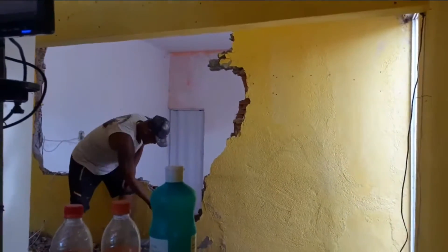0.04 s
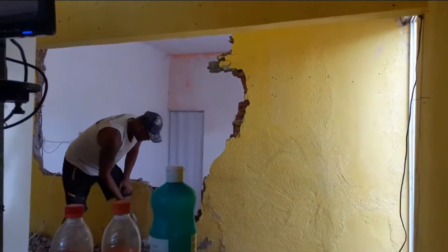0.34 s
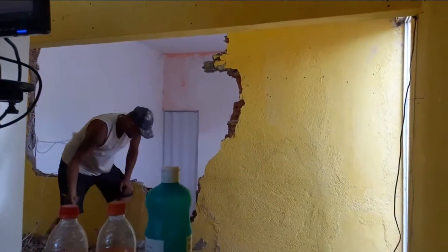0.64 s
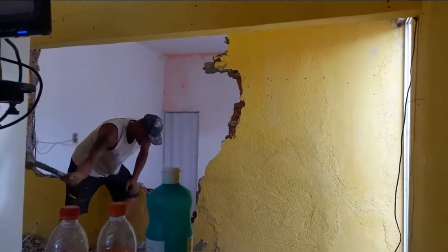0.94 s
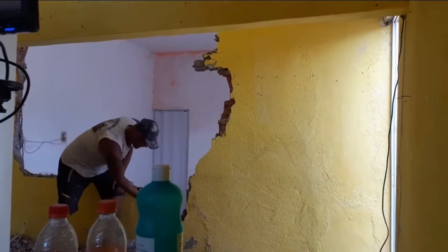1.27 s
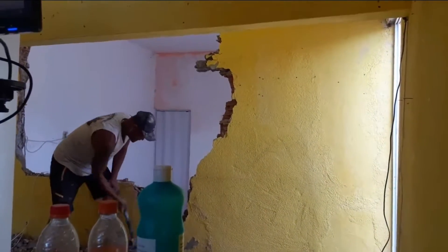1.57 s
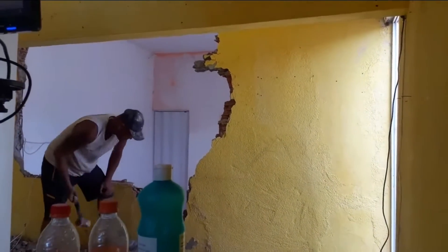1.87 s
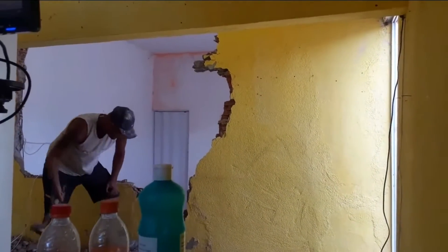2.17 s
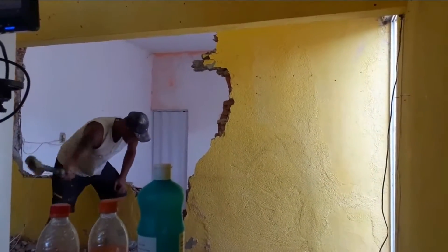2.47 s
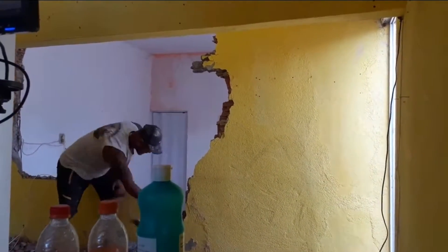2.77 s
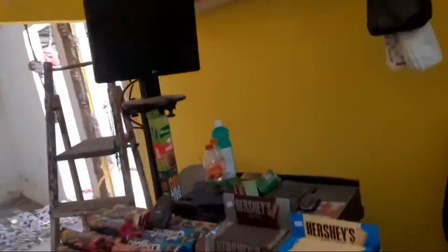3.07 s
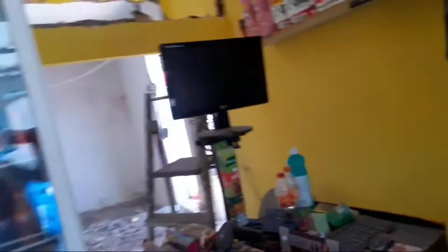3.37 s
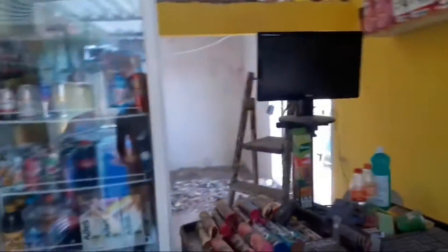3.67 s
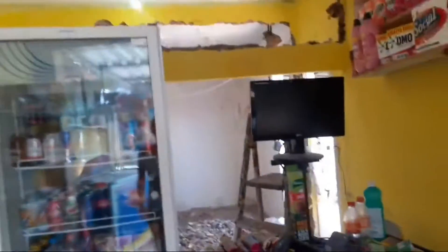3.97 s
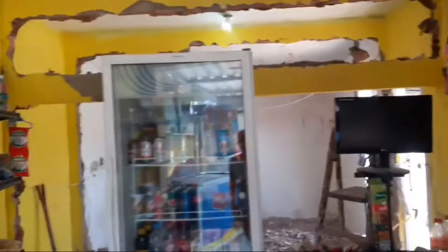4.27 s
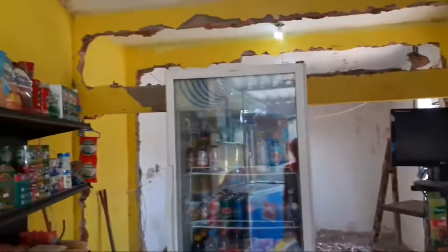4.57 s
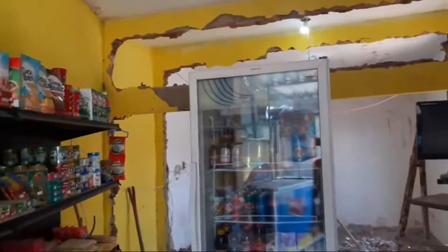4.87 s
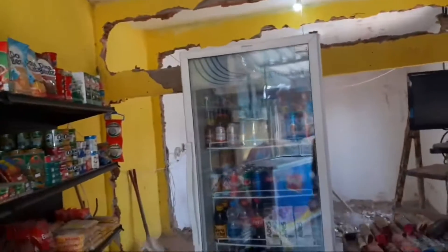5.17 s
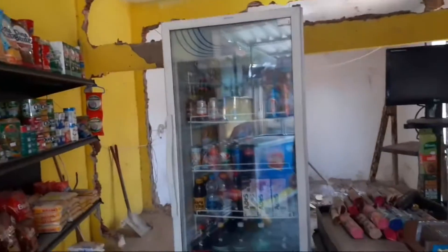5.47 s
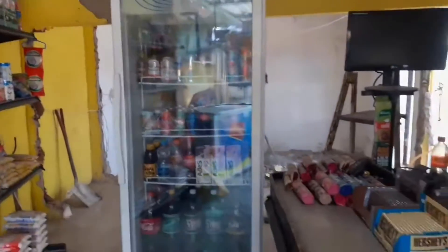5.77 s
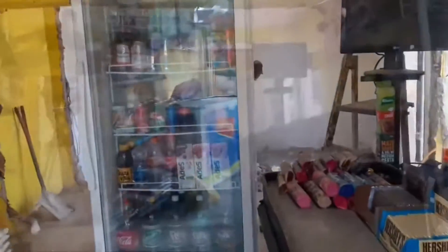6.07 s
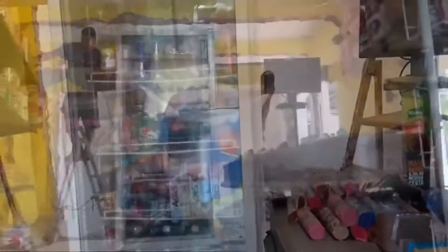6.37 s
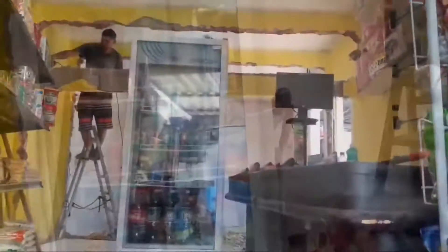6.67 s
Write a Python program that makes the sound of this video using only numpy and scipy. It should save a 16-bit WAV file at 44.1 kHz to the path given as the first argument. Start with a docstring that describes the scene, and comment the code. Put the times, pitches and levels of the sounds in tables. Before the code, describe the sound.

A sledgehammer hits a brick wall right at the start, a sharp crack with a deep boom that rings briefly through a bare room. Small chips tick and clink on the floor amid a fine trickle of mortar dust. A second blow lands at about 1.4 seconds, with more falling chips, and a third, duller and cut short, at 3 seconds. From there broken masonry slides and clatters against a ringing steel shovel, somewhat to the right, with a low rumble and dull thuds from the heap. The first run of short slides lasts until about 4.2 seconds; after a lull, a second runs from 5 to 6 seconds. From about 5.7 seconds a distant grinder swells up, its disc hissing and its whine sinking as it bites, growing louder until the end near 7 seconds. A cooler hums faintly underneath.

```python
"""A bare room with a humming cooler. A sledgehammer strikes a brick wall three times: the brick cracks,
wall and room boom, chips and mortar dust patter down. Then broken masonry slides and clatters against
a ringing steel shovel, in two runs of short slides, while the heap rumbles underneath.
At the end a distant grinder swells up, its disc hissing and its whine sinking as it bites."""
import sys
import numpy as np
from scipy import signal
from scipy.fft import rfft, irfft, next_fast_len
from scipy.io import wavfile
from scipy.ndimage import uniform_filter1d

SR = 44100
rng = np.random.default_rng(int(sys.argv[2]) if len(sys.argv) > 2 else 0)


def master_out(mix):
    """Clip the mix to full scale and print it as 16-bit PCM to the path in sys.argv[1]."""
    frames = np.transpose(np.atleast_2d(mix))
    ceiling = np.clip(frames, -1, 1)
    pcm = np.round(ceiling * 32767).astype(np.int16)
    wavfile.write(sys.argv[1], SR, pcm)


N = 306054
TIME = np.arange(N) / SR


def from_db(db):
    """Decibels to gain."""
    return np.exp(np.asarray(db) * (np.log(10) / 20))


def rms_one(x):
    """Scale to rms 1."""
    return x / np.sqrt(np.mean(x ** 2) + 1e-20)


def at_hz(points, hz):
    """Read a table on a log-frequency axis."""
    freqs, values = np.transpose(points)
    return np.interp(np.log(hz + 1e-9), np.log(freqs), values)


def colour(x, spectrum):
    """EQ a sound to a curve that falls away steeply beyond its ends; rms 1."""
    size = next_fast_len(N, True)
    hz = np.linspace(0, SR / 2, size // 2 + 1)
    low_cut = 1 + (.8 * spectrum[0][0] / (hz + 1)) ** 8
    high_cut = 1 + (.8 * hz / spectrum[-1][0]) ** 8
    gain = from_db(at_hz(spectrum, hz)) / np.sqrt(low_cut * high_cut)
    return rms_one(irfft(rfft(x, size) * gain, size)[..., :N])


def pan_gains(left_db):
    """Stereo gains that put left this many dB over right."""
    return from_db(left_db / 2 * np.array([[1], [-1]]))


def panned(x, pan):
    """Lean a stereo sound left or right, differently in each band."""
    size = next_fast_len(N, True)
    left_db = at_hz(pan, np.linspace(0, SR / 2, size // 2 + 1))
    return irfft(rfft(x, size) * pan_gains(left_db), size)[:, :N]


def add(out, start_s, sound):
    """Mix a sound in at its start time."""
    start = max(round(start_s * SR), 0)
    out[..., start:start + sound.shape[-1]] += sound[..., :N - start]


def resonance(x, hz, width_hz):
    """Two-pole resonance that keeps the power of white noise."""
    r = np.exp(-np.pi * width_hz / SR)
    feedback = [1, -2 * r * np.cos(2 * np.pi * hz / SR), r * r]
    return signal.lfilter(np.sqrt((1 - r * r) / 2) * np.array([1, 0, -1]), feedback, x)


def drift(per_s):
    """Slow random wandering; rms 1."""
    knots = rng.standard_normal(4096)
    return rms_one(np.interp(TIME * per_s, np.arange(len(knots)), knots))


def swells(rows, attack_s, release_s):
    """Envelope of events (start s, length s, dB) that rise, hold and die away; their powers add."""
    power = 0
    for start_s, length_s, db in rows:
        age = np.maximum(TIME - start_s, 0)
        rise = 1 - np.exp(-age / attack_s)
        fall = np.exp(-np.maximum(age - length_s, 0) / release_s)
        power = power + (from_db(db) * rise * fall) ** 2
    return np.sqrt(power)


def grains(per_s, spread_db, size=N):
    """Random tiny collisions of unequal strength; rms 1."""
    strength = from_db(spread_db * np.minimum(rng.exponential(1, size), 4))
    return rms_one(strength * rng.choice([-1, 1], size) * (rng.random(size) < per_s / SR))


# The room's stereo image. Each row: frequency in Hz, left-right correlation.
STEREO_LIKENESS = [(60, 0.91), (170, 0.98), (330, 0.89), (600, 0.22), (1300, -0.059), (3000, -0.042),
                   (15000, -0.064)]

def room_noise(size):
    """Stereo white noise, alike in the bass and unrelated in the treble."""
    padded = next_fast_len(size, True)
    mid, side = rfft(rng.standard_normal((2, padded)))
    alike = np.clip(at_hz(STEREO_LIKENESS, np.linspace(0, SR / 2, len(mid))), -1, 1)
    return irfft(np.sqrt(1 + alike) * mid + np.sqrt(1 - alike) * side * [[1], [-1]], padded)[:, :size]


def in_room(x, direct_db, t60):
    """Direct sound, then a diffuse wash from bare walls that stores its energy and lets it die."""
    retained = from_db(-120 / (t60 * SR))
    stored = signal.lfilter([0, 1 - retained], [1, -retained], x * x + 1e-18)
    return (from_db(direct_db) * x + np.sqrt(stored) * room_noise(N)) / np.hypot(1, from_db(direct_db))


def near_echoes(x, echo_db, longest_s, change_per_s, count=26):
    """Reflections off nearby surfaces colour the sound, differently as the point of impact moves."""
    out, power = x, 1
    for lag in (rng.uniform(.05, 1, count) * longest_s * SR).astype(int):
        gain = from_db(echo_db) * drift(change_per_s)
        out = out + gain * np.pad(x, [(0, 0), (lag, 0)])[:, :N]
        power = power + gain ** 2
    return out / np.sqrt(power)


# The dull bed of air. Each row: frequency in Hz, EQ gain in dB.
AIR_EQ = [(25, -27.5), (55, -6), (90, -8.5), (130, 2.5), (180, -2), (260, -5.5), (470, -9.5), (700, -13),
          (1200, -23), (2600, -24), (5000, -34.5), (8300, -33), (10000, -47), (15000, -42.5)]
# The cooler's hum. Each row: frequency in Hz, relative level in dB.
COOLER_PARTIALS = [(59.2, -2.5), (134.6, -9), (242.2, -11), (473.7, -16.5)]
# Fader moves on the bed. Each row: start in seconds, air level in dB, hum gain in dB.
BED_LEVELS = [(0, -53, -54), (2.35, -56.5, -55), (2.97, -49.5, -63), (5.7, -60.5, -68.5)]

def room_tone(fade_s=.36):
    """Dull air and the hum of a cooler, fading from one steady level to the next."""
    starts, *levels_db = np.transpose(BED_LEVELS)
    stretch = np.searchsorted(starts[1:], TIME)
    air_db, hum_db = [uniform_filter1d(db[stretch], round(fade_s * SR)) for db in levels_db]
    hum = np.sqrt(2) * sum(from_db(db) * np.sin(2 * np.pi * hz * TIME) for hz, db in COOLER_PARTIALS)
    return from_db(air_db) * colour(room_noise(N), AIR_EQ) + from_db(hum_db) * hum


# The dust's fizz. Each row: frequency in Hz, EQ gain in dB.
DUST_EQ = [(1500, -2), (4000, -1.5), (8000, -2), (10000, -7), (14000, -5.5), (16000, -11)]
# Trickles of dust. Each row: start in seconds, length in seconds, level in dB.
DUST_TRICKLES = [(-0.05, 0.064, -56.5), (.22, 0.39, -56), (1.62, 0.29, -56.5)]

def dust():
    """Mortar dust trickles to the floor as a dense spray of tiny ticks."""
    spray = in_room(grains(per_s=1500, spread_db=-3), direct_db=-3.5, t60=.4)
    return swells(DUST_TRICKLES, attack_s=.05, release_s=.16) * colour(spray, DUST_EQ)


# The room's tail. Each row: frequency in Hz, seconds to fall 60 dB.
ROOM_DECAY = [(50, 2.1), (120, 0.84), (250, 0.64), (600, 0.6), (1500, 0.63), (3000, 0.52), (6000, 0.22),
              (10000, .32), (15000, 0.19)]
BLOW_AGE = np.arange(65536) / SR   # seconds since the hammer landed

def room_ring(spectrum, tilt_db, hold_s, build_cycles=1):
    """The room's answer to a knock: each band builds up, holds and dies at its own rate."""
    white = [room_noise(len(BLOW_AGE)) for _ in range(2)]
    edges = np.geomspace(28, 16000, 23)
    centres = np.sqrt(edges[1:] * edges[:-1])
    gains = from_db(at_hz(spectrum, centres) + tilt_db * np.log2(centres / 2500))
    gains *= np.sqrt(np.diff(edges))   # wider bands carry more power
    gains *= (centres > spectrum[0][0] / 2) * (centres < spectrum[-1][0])
    out = 0
    for k in np.flatnonzero(gains):
        band_pass = signal.butter(2, edges[k:k + 2], "band", fs=SR, output="sos")
        band = signal.sosfilt(band_pass, white[k % 2])
        rise = 1 - np.exp(-BLOW_AGE * centres[k] / build_cycles)
        fall = from_db(-60 * np.maximum(BLOW_AGE - hold_s, 0) / at_hz(ROOM_DECAY, centres[k]))
        envelope = rise * fall
        out = out + gains[k] * rms_one(band * envelope) * np.sqrt(np.mean(envelope ** 2))
    return out / np.linalg.norm(gains)


# Modes of wall and room. Each row: frequency in Hz, relative level in dB, seconds to fall 60 dB.
WALL_MODES = [(58.1, -8.5, 1.5), (71.7, -11.5, 1.4), (86, -16.5, 1.1), (119.26, 7.5, 0.59),
              (129.9, -2.5, 0.95), (188.1, 1, .7), (230, -10.5, 0.93), (266.2, -6, 0.44), (287.5, -18, 1.2),
              (379.2, -17.5, 0.39), (407, -22, 0.39), (473, -9.5, 0.24), (665, -8, 0.22),
              (815, -27.5, 0.99), (1193, -28.5, .35), (1407, -22.5, .3)]
# The dull body of a blow. Each row: frequency in Hz, EQ gain in dB.
BOOM_EQ = [(30, -26), (42, -21), (55, -12), (90, -11), (125, 1.5), (160, -8), (210, 2), (300, -7),
           (400, -10.5), (520, -12), (750, -18.5), (1100, -25), (2000, -49.5)]

def wall_boom(tilt_db, modes_db=-6, diffuse_db=-6.5, swell_s=.011):
    """The shoved wall's low modes swell and boom through the room."""
    diffuse = room_ring(BOOM_EQ, tilt_db, hold_s=.044, build_cycles=.9)
    modes = 0
    for k, (hz, db, t60) in enumerate(WALL_MODES):
        polarity = (-1) ** (k + 1)
        modes = modes + polarity * from_db(db - 60 * BLOW_AGE / t60) * np.sin(2 * np.pi * hz * BLOW_AGE)
    return from_db(diffuse_db) * diffuse + from_db(modes_db) * modes * (1 - np.exp(-BLOW_AGE / swell_s))


# The sharp edge of a blow. Each row: frequency in Hz, EQ gain in dB.
CRACK_EQ = [(400, -15.5), (900, -8), (1400, -4), (2500, -4), (4000, 0.5), (6000, -6), (8000, -4.5),
            (9800, -19.5), (12000, -13), (15500, -21.5)]

def brick_crack(crack_db, tilt_db, ring_hz, ring_db, snap_s=.0013):
    """Splitting makes the attack sharp and grainy, and the hollow brick rings with every split."""
    splits = grains(per_s=450, spread_db=2, size=len(BLOW_AGE))
    crunch = rms_one(np.abs(uniform_filter1d(splits, size=45)))
    snap = 1 + np.exp(-BLOW_AGE / snap_s) + .98 * crunch * np.exp(-BLOW_AGE / .05)
    crack = room_ring(CRACK_EQ, tilt_db, hold_s=.0044) * snap
    burst = room_noise(len(BLOW_AGE)) * snap * np.exp(-BLOW_AGE / .066)
    return from_db(crack_db) * crack + from_db(ring_db) * resonance(burst, ring_hz, width_hz=1100)


# The three hits. Each row: start in seconds, boom gain in dB, boom tilt in dB per octave, crack gain in dB,
# crack tilt in dB per octave, brick ring in Hz, ring gain in dB, seconds until the hit breaks off.
HAMMER_HITS = [(0.078, -9, 1.5, -21, 1.3, 1320, -26.5, 2.5), (1.417, -5, 1.5, -21, -3.4, 2500, -23, 2.5),
               (2.97, -6, 3, -23.5, -8.5, 2030, -25, 0.094)]
# Where the hits sit. Each row: frequency in Hz, left over right in dB.
HAMMER_PAN = [(60, -0.5), (380, 0), (700, 1.5), (1300, 0), (2400, -5), (4400, 1), (15000, 3)]

def hammer(end_fade_s=.023, tremor_lead_s=.0045, tremor_db=-21):
    """The head cracks the brick and shoves the wall; a weak floor tremor outruns the sound in the air."""
    booms, cracks = np.zeros((2, 2, N))
    for start_s, boom_db, boom_tilt, crack_db, crack_tilt, ring_hz, ring_db, length_s in HAMMER_HITS:
        ending = np.exp(-np.maximum(BLOW_AGE - length_s, 0) / end_fade_s)
        add(booms, start_s, from_db(boom_db) * wall_boom(boom_tilt) * ending)
        add(cracks, start_s, brick_crack(crack_db, crack_tilt, ring_hz, ring_db) * ending)
    blows = booms + near_echoes(cracks, echo_db=-18, longest_s=.008, change_per_s=8)
    early = np.roll(blows, -round(tremor_lead_s * SR), axis=1)
    tremor = signal.lfilter([.3], [1, -.7], early)   # gentle low-pass
    return panned(blows + from_db(tremor_db) * tremor, HAMMER_PAN)


def landings(rows, per_s, first_tick, clatter_s, size=16384):
    """Each piece lands with a sharp tick and a dying scatter; its level is the rms over clatter_s."""
    out, age = np.zeros(N), np.arange(size) / SR
    for start_s, level_db, scatter_s, _ in rows:
        ticks = grains(per_s, spread_db=13.5, size=size) * np.exp(-age / scatter_s)
        ticks /= np.linalg.norm(ticks)
        ticks[0] += first_tick
        add(out, start_s, from_db(level_db) * ticks / np.linalg.norm(ticks) * np.sqrt(clatter_s * SR))
    return out


def clinks(rows, t60, width_hz=220, size=16384):
    """Each landing piece rings briefly at a pitch of its own."""
    out, age = np.zeros((2, N)), np.arange(size) / SR
    for start_s, level_db, _, hz in rows:
        ring = rms_one(resonance(room_noise(size), hz, width_hz))
        add(out, start_s, ring * from_db(level_db - 60 * age / t60))
    return out


# Falling chips. Each row: start in seconds, level in dB, scatter decay in seconds, clink pitch in Hz.
CHIP_LANDINGS = [(0.412, -50, 0.015, 3197), (0.485, -61.5, 0.045, 5430), (0.606, -51.5, 0.048, 2470),
                 (0.655, -52, 0.015, 7100), (0.674, -48.5, 0.0059, 5400), (0.958, -57.5, 0.013, 3240),
                 (1.778, -49, 0.015, 8130), (1.845, -53, 0.016, 7500), (2.065, -52.5, 0.063, 3080),
                 (2.14, -55, 0.073, 5660), (2.168, -48.5, 0.017, 3220), (2.385, -69.5, 0.012, 8200),
                 (2.745, -68, 0.023, 2690)]
# Their brittle tone. Each row: frequency in Hz, EQ gain in dB.
CHIP_EQ = [(500, -10), (1300, -7), (2800, 2.5), (4000, 3), (5400, -1), (8000, 3), (10000, -5.5),
           (14000, -1.5), (16000, -27)]

def chips(clink_db=-3.5):
    """Chips tick and clink on the floor amid the dust, after the first two blows."""
    ticks = landings(CHIP_LANDINGS, per_s=650, first_tick=.42, clatter_s=.024)
    ticks = in_room(ticks, direct_db=-8, t60=.25)
    patter = colour(ticks, CHIP_EQ) * np.std(ticks) + dust()
    rings = from_db(clink_db) * clinks(CHIP_LANDINGS, t60=.27)
    return rings + near_echoes(patter, echo_db=-19, longest_s=.004, change_per_s=16)


# The crackle of grit. Each row: frequency in Hz, EQ gain in dB.
GRIT_EQ = [(1180, -14.5), (2000, -10.5), (2990, -7.5), (3840, -6.5), (4360, -6), (5180, -7), (6520, -5.5),
           (7110, -9.5), (7740, -3.5), (9680, -18.5), (12000, -12), (14100, -15.5), (15500, -21)]
# The blade's ring. Each row: frequency in Hz, width in Hz, relative level in dB.
SHOVEL_MODES = [(2750, 140, -7.5), (3026, 130, -5.5), (4200, 100, -14), (4530, 180, -11), (5700, 190, -8.5),
                (6640, 62, -1.5), (7520, 160, -7.5), (7720, 91, -1.5), (7980, 75, -4.5), (8530, 220, -15),
                (10400, 170, -12), (11170, 85, -16), (11690, 200, -16)]

def on_shovel(ticks, ring_db, ring_left_db=0):
    """Grit crackles and sets the steel blade ringing; rms 1."""
    steel = rms_one(sum(from_db(db) * resonance(ticks, hz, width) for hz, width, db in SHOVEL_MODES))
    return rms_one(colour(ticks, GRIT_EQ) + from_db(ring_db) * steel * pan_gains(ring_left_db))


# Larger pieces. Each row: start in seconds, level in dB, scatter decay in seconds, clink pitch in Hz.
SHOVEL_HITS = [(2.972, -26.5, 0.041, 8460), (3.087, -27, 0.023, 7560), (3.172, -37.5, 0.0075, 5940),
               (3.351, -52, .02, 4300), (3.566, -19.5, 0.0045, 7500), (3.655, -26, 0.011, 7800),
               (3.799, -39, 0.0057, 2860), (3.936, -33, 0.0081, 7600), (3.992, -23, 0.023, 6020),
               (4.25, -52, 0.032, 6950), (4.419, -46, 0.0085, 7900), (4.708, -55, 0.008, 5640),
               (4.805, -58, 0.01, 7950), (4.962, -34.5, 0.014, 7440), (5.049, -26, .012, 7800),
               (5.131, -24.5, 0.005, 6640), (5.175, -33.5, 0.015, 4530), (5.238, -18.5, 0.016, 7630),
               (5.267, -17, 0.064, 7420), (5.44, -26, 0.012, 8000), (5.527, -26.5, 0.01, 7020),
               (5.621, -24.5, 0.057, 7680), (5.822, -24, 0.018, 7470), (5.89, -32, 0.0055, 7250),
               (6.018, -35, 0.0086, 7900)]

def clatter(clink_db=-4):
    """Larger pieces hit the shovel: the blade rings on the right and each piece clinks."""
    pieces = landings(SHOVEL_HITS, per_s=1100, first_tick=.6, clatter_s=.008)
    pieces = in_room(pieces, direct_db=-4, t60=.3)
    blade = on_shovel(pieces, ring_db=-8.5, ring_left_db=-20.5) * np.std(pieces)
    return blade + from_db(clink_db) * clinks(SHOVEL_HITS, t60=.28)


def shards(per_s=320, low_hz=1100, high_hz=9000, q=35, count=40):
    """Bits of brick of many sizes knock together, each with a short pitched clack; rms 1."""
    knocks = grains(per_s, spread_db=2)
    struck_bit = rng.integers(0, count, N)
    out = 0
    for k, hz in enumerate(np.geomspace(low_hz, high_hz, count)):
        clack = resonance(knocks * (struck_bit == k) + 1e-18, hz, hz / q)
        out = out + clack * rng.choice([-1, 1], (2, 1))   # random polarity per side, for width
    return rms_one(out)


# The heap gives way. Each row: start in seconds, length in seconds, grit level in dB, lump level in dB.
RUBBLE_SLIDES = [(2.997, 0.27, -30, -35.5), (3.329, 0.18, -28.5, -35.5), (3.56, 0.095, -25.5, -31.5),
                 (3.77, 0.042, -25.5, -30.5), (3.923, 0.13, -28.5, -31.5), (4.126, 0.098, -37, -45.5),
                 (4.36, 0.16, -50, -57), (4.58, .35, -54, -64), (4.955, 0.11, -27.5, -35.5),
                 (5.118, 0.2, -24.5, -29.5), (5.396, 0.13, -31, -35), (5.522, 0.047, -27, -35.5),
                 (5.614, 0.092, -27.5, -30.5), (5.816, .03, -29, -41), (5.979, 0.026, -30, -37)]
# The chunky tone of lumps. Each row: frequency in Hz, EQ gain in dB.
LUMP_EQ = [(110, -54), (180, -6.5), (282, -11.5), (309, -3.5), (380, 1), (555, -6.5), (801, 0),
           (1180, -7.5), (1600, -2), (2800, -2), (3640, -26), (6160, -120)]
# The heap lies to the right, most clearly in the treble. Each row: frequency in Hz, left over right in dB.
HEAP_PAN = [(200, -0.5), (1300, -1), (2400, -1), (4400, -2.5), (8000, -11), (11000, -0.5), (15000, -4.5)]

def rubble(shards_db=-6.5):
    """In each slide the grit runs first and the lumps tumble after it; larger pieces clatter on top."""
    grit_rows = [(start_s, length_s, db) for start_s, length_s, db, _ in RUBBLE_SLIDES]
    lump_rows = [(start_s, length_s, db) for start_s, length_s, _, db in RUBBLE_SLIDES]
    fine = in_room(grains(per_s=1100, spread_db=4.5), direct_db=-6, t60=.3)
    grit = on_shovel(fine, ring_db=-12) * swells(grit_rows, attack_s=.019, release_s=.1)
    coarse = in_room(grains(per_s=500, spread_db=0), direct_db=-8.5, t60=1.0)
    lumps = colour(coarse, LUMP_EQ) + from_db(shards_db) * shards()
    lumps *= swells(lump_rows, attack_s=.036, release_s=.097)
    masonry = near_echoes(grit + lumps + clatter(), echo_db=-20, longest_s=.004, change_per_s=22)
    return panned(masonry, HEAP_PAN)


# Dull thuds. Each row: start in seconds, level in dB.
HEAP_THUDS = [(3.08, -33.5), (4.35, -36.5), (4.448, -39), (4.525, -42), (4.92, -43), (5.87, -42)]
# The heap's low-end weight. Each row: frequency in Hz, EQ gain in dB.
RUMBLE_EQ = [(30, -18), (60, -28), (110, 2.5), (160, -3.5), (260, -2.5), (400, -10.5), (900, -10.5),
             (1800, -19)]

def heap_rumble(rumble_db=-17, thud_hold_s=.014):
    """The heap rumbles under the rolling lumps and thuds when a heavy piece settles."""
    rolls = [(start_s, length_s, db + rumble_db) for start_s, length_s, _, db in RUBBLE_SLIDES]
    thuds = [(start_s, thud_hold_s, db) for start_s, db in HEAP_THUDS]
    rolling = swells(rolls, attack_s=.036, release_s=.2)
    settling = swells(thuds, attack_s=.014, release_s=.065)
    return np.hypot(rolling, settling) * colour(room_noise(N), RUMBLE_EQ)


def grinder_whine(phase, steady, slowing_db=-10.5, settled_db=-6, flutter_db=5):
    """A rough band of noise around the disc's pitch; it narrows and flutters once the speed steadies."""
    low_passes = [signal.butter(2, width_hz, fs=SR, output="sos") for width_hz in (190, 65)]
    wide, narrow = [rms_one(signal.sosfilt(sos, rng.standard_normal((2, 2, N)))) for sos in low_passes]
    smear = from_db(slowing_db) * np.sqrt(1 - steady) * wide
    smear += from_db(settled_db) * np.sqrt(steady) * narrow
    flutter = from_db(flutter_db * steady * drift(per_s=22))
    return (smear[0] * np.cos(phase) + smear[1] * np.sin(phase)) * flutter


# The pitch sinking under load. Each row: time in seconds, whine pitch in Hz.
WHINE_GLIDE = [(6.0, 5480), (6.35, 5230), (6.52, 5020), (6.66, 4750), (6.8, 4470), (6.94, 4410)]
# The disc's hiss. Each row: frequency in Hz, EQ gain in dB.
GRINDING_EQ = [(120, -37), (200, -14), (249, -20), (358, -14.5), (399, -12.5), (728, -13.5), (812, -6),
               (1090, -10.5), (1880, -7), (2470, -3), (2700, -2), (3750, -2), (4500, -3), (6590, -5.5),
               (15500, -6.5)]
# The ring of body and disc. Each row: frequency in Hz, width in Hz, level against the hiss in dB.
DISC_MODES = [(237, 140, -29), (2460, 60, -17.5), (3026, 66, -15.5)]
# The motor's drone. Each row: fraction of the whine's pitch, level against the hiss in dB.
MOTOR_PARTIALS = [(1 / 36, -32), (1 / 18, -27.5)]

def grinder(start_s=5.67, attack_s=.13, start_db=-37.5, rise_db_per_s=10, settles_s=6.78, waver_db=2.5):
    """The disc hisses on masonry and rings, ever louder; whine and drone sink with its speed."""
    age = np.maximum(TIME - start_s, 0)
    level = from_db(start_db + rise_db_per_s * age) * (1 - np.exp(-age / attack_s))
    biting = np.interp(TIME, [6.15, 6.35], [0, 1])   # whine and drone enter once the disc is in the cut
    steady = .5 + .5 * np.tanh((TIME - settles_s) / .033)   # 0 while slowing, 1 once settled
    whine_hz = np.interp(TIME, *np.transpose(WHINE_GLIDE))
    wobble = 1 + .014 * (1 - steady) * drift(per_s=25)
    phase = 2 * np.pi * np.cumsum(whine_hz * wobble) / SR
    whine = grinder_whine(phase, steady)
    friction = room_noise(N)
    hiss = colour(room_noise(N), GRINDING_EQ)
    ring = sum(from_db(db) * resonance(friction, hz, width) for hz, width, db in DISC_MODES)
    drone = np.sqrt(2) * sum(from_db(db + waver_db * drift(per_s=16)) * np.sin(fraction * phase)
                             for fraction, db in MOTOR_PARTIALS)
    return level * (hiss + ring + biting * (whine + drone))


def scene():
    """Blows, falling chips, sliding rubble and the grinder over the room's bed."""
    return hammer() + chips() + rubble() + heap_rumble() + grinder() + room_tone()


def record(dry, ceiling=.94, cutoff_hz=15650):
    """Soft-clip the loudest peaks and cut the top end steeply."""
    low_pass = signal.ellip(12, .1, 80, cutoff_hz, fs=SR, output="sos")
    return signal.sosfilt(low_pass, ceiling * np.tanh(dry / ceiling))


dry = scene()
out = record(dry)
master_out(out)
```